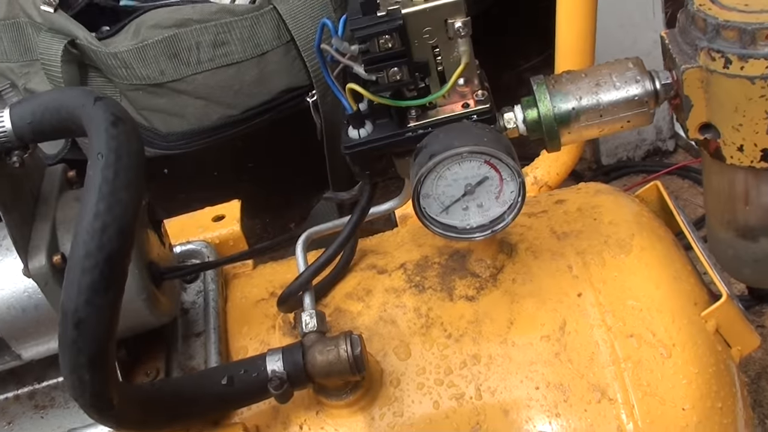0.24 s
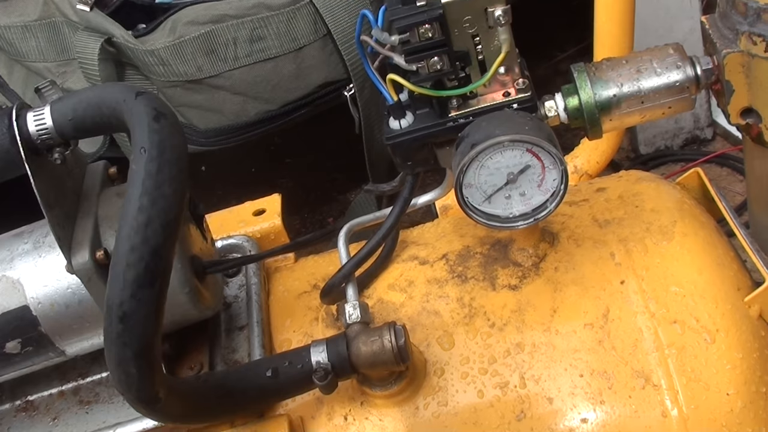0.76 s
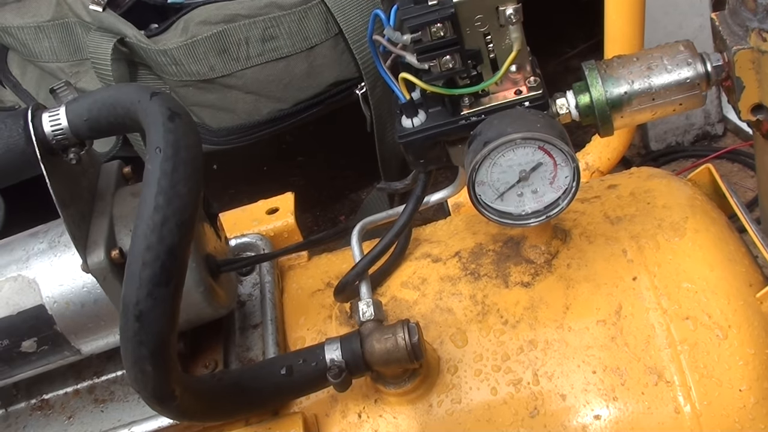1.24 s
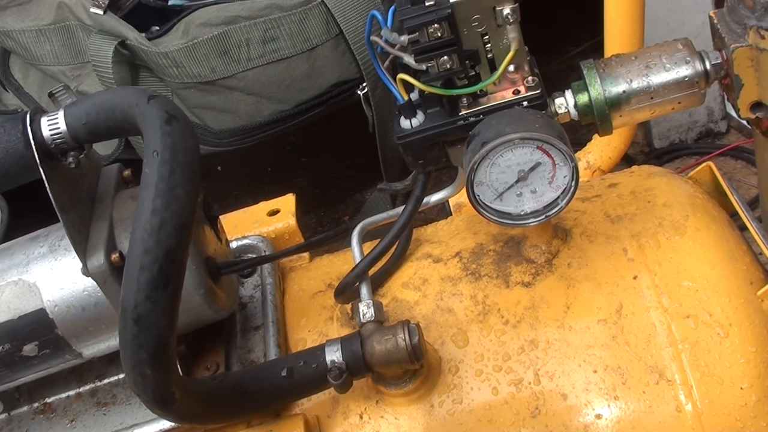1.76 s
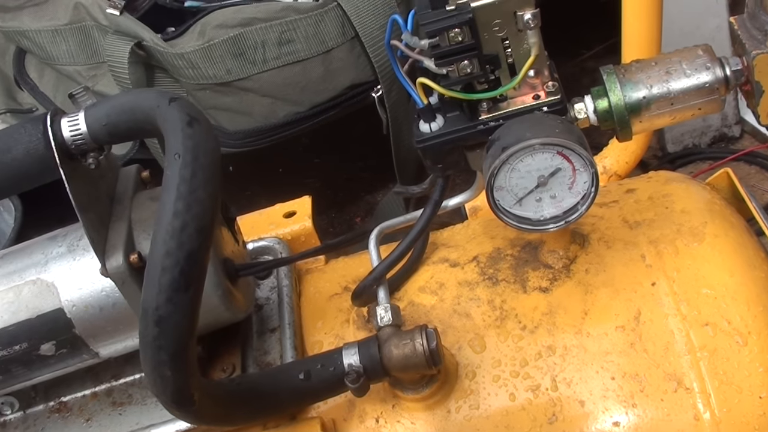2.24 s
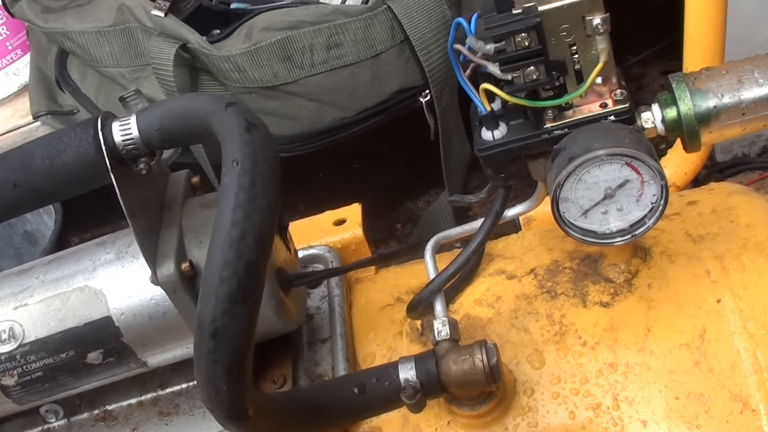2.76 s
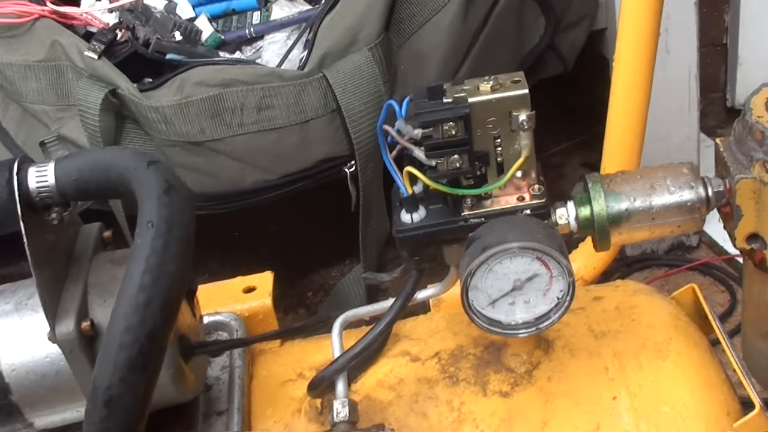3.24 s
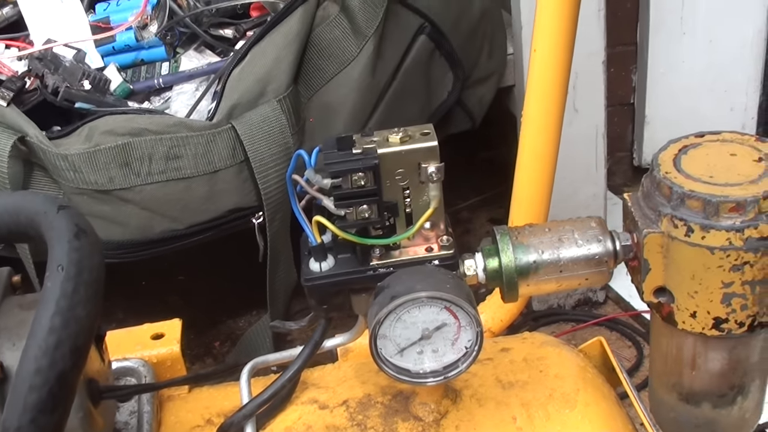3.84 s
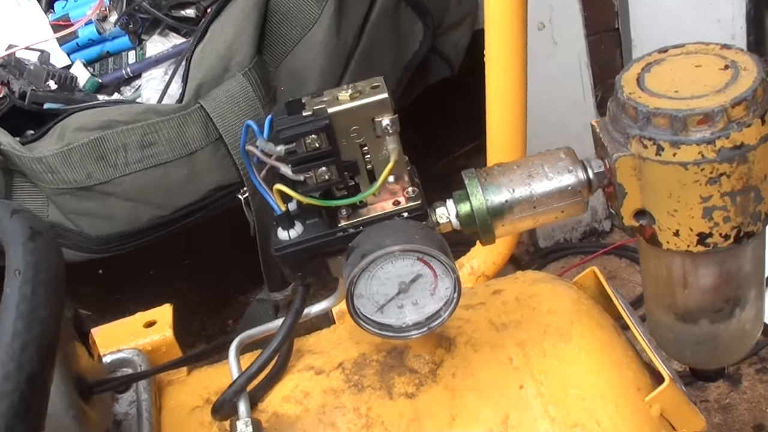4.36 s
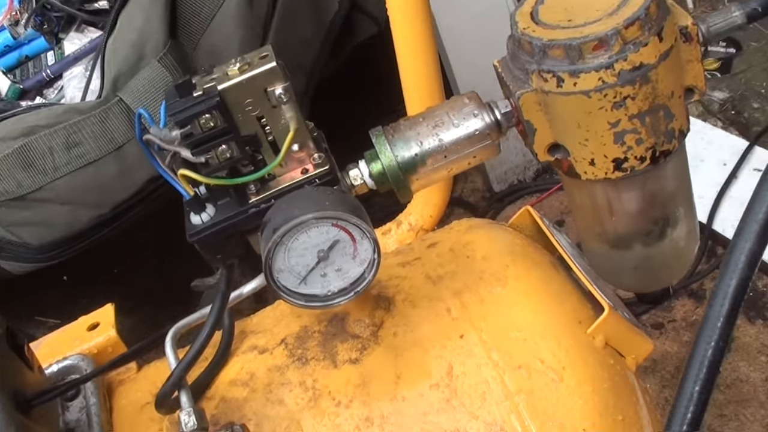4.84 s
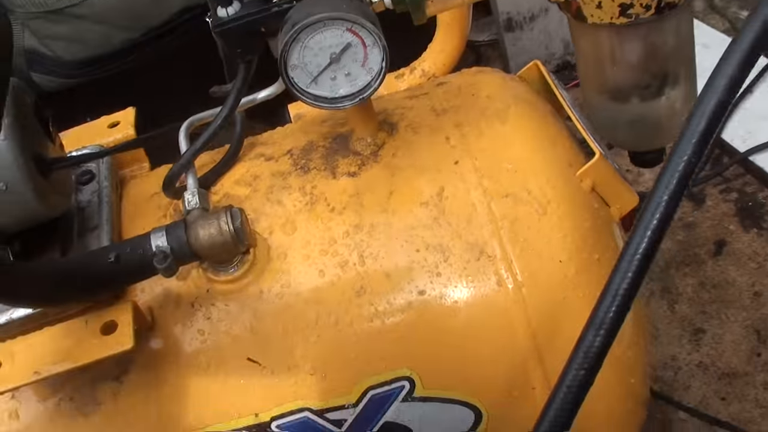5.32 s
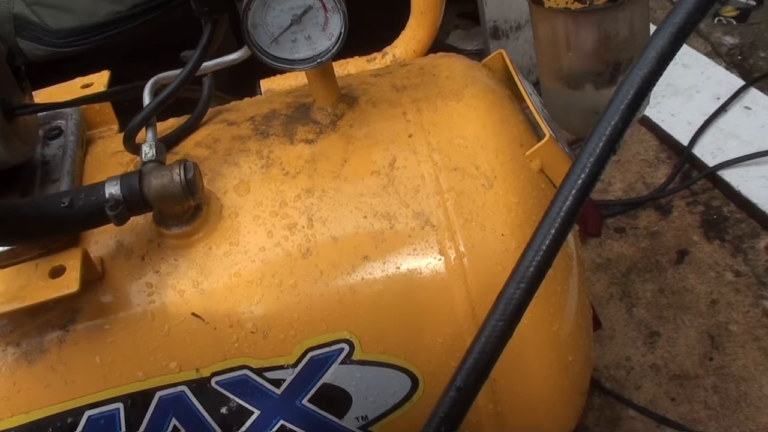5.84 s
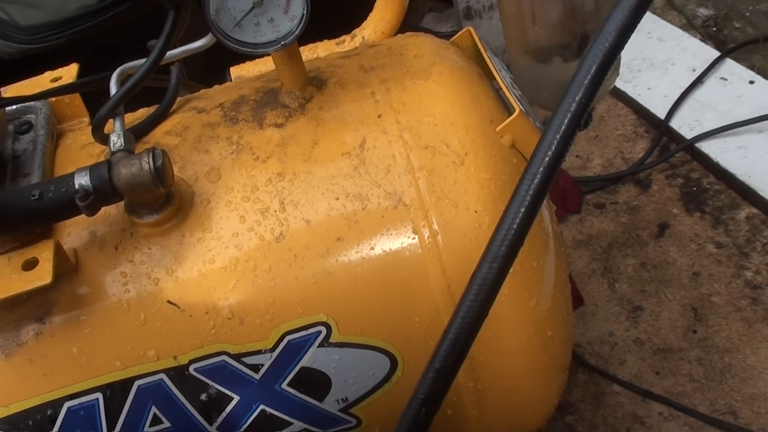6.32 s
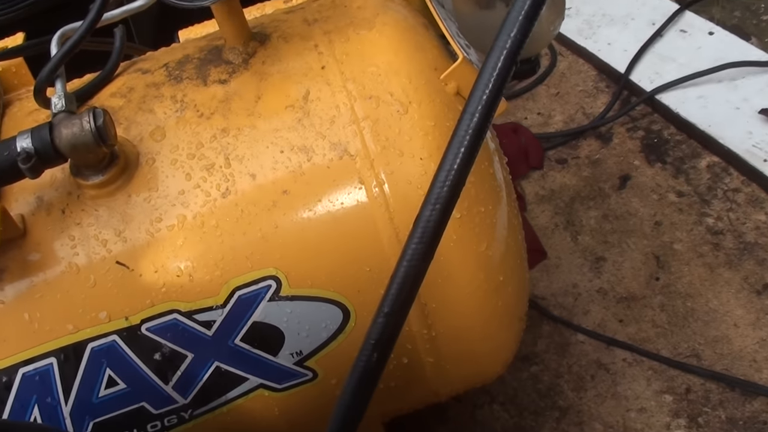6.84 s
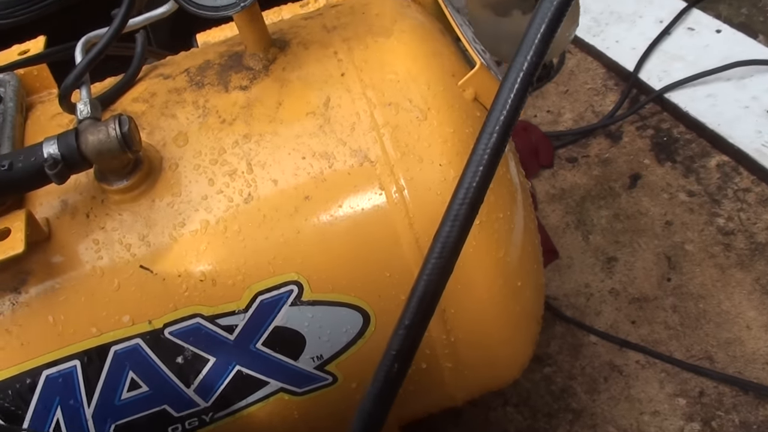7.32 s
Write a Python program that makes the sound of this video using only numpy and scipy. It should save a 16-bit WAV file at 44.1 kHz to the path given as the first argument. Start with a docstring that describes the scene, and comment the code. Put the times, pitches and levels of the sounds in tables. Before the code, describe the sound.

A continuous bright air leak fades a little, then grows strong close to the microphone, with scattered faint ticks and bumps over it.

```python
"""A workshop: compressed air hisses out of a compressor tank while a hand-held microphone moves over it.
The jet is noise in four bands with levels that vary in time; metal around it adds resonances and notches,
which change from the nook beside the pump to the pressure switch, the filter and the tank.
Dull handling knocks and ticks are decaying sines with a noise tail; the quiet room is steady coloured noise."""
import sys
import numpy as np
from scipy import signal
from scipy.fft import rfft, irfft
from scipy.io import wavfile

SR = 44100
rng = np.random.default_rng(int(sys.argv[2]) if len(sys.argv) > 2 else 0)


def dump_mix(stems):
    """Bounce the given channels to the path in sys.argv[1] as a 16-bit WAV at rate SR."""
    frames = np.atleast_2d(stems).T  # one column per channel
    limited = np.clip(frames, -1, 1)  # hard clip at full scale
    pcm = np.round(limited * 32767).astype(np.int16)
    wavfile.write(sys.argv[1], SR, pcm)


N = 334278
FRAME, HOP = 1024, 256  # samples
HZ = np.fft.rfftfreq(FRAME, 1 / SR)
T = np.arange(N // HOP + 5)[:, None] * HOP / SR  # frame times, s

# Jet at the moving microphone. Each row: time in seconds, hiss and fizz band levels in dB before the mix.
JET_LEVELS = [(0.03, -30, -34.5), (0.22, -30, -35.5), (0.34, -29.5, -35), (0.43, -33, -36.5),
              (1.1, -35, -38), (1.58, -38.5, -40.5), (2.1, -33.5, -37), (2.44, -36, -40.5),
              (3.36, -27.5, -32), (3.49, -24, -26), (3.53, -25, -32), (3.8, -20.5, -28), (3.97, -17.5, -22),
              (3.99, -21.5, -25.5), (4.78, -24, -23), (5.26, -24.5, -29), (5.41, -28, -30),
              (5.71, -25.5, -27), (5.81, -23.5, -29), (5.96, -23, -22.5), (6.15, -26, -22.5),
              (6.31, -25.5, -21.5), (6.44, -26.5, -27), (6.58, -24, -21), (7.42, -22.5, -20),
              (7.55, -21, -21.5)]
# Edges of the rush, body, hiss and fizz bands, in Hz.
JET_EDGES_HZ = [1200, 2500, 5500, 9500, 15800]
# Broad colour of the jet, before band levelling. Each row: frequency in Hz, relative density in dB per Hz.
JET_COLOUR = [(150, -31.5), (400, -22), (750, -20.5), (1300, -17), (2000, -13.5), (2550, -13), (3400, -9),
              (4500, -8.5), (5400, -5.5), (6700, -2), (8000, -3), (10000, -5), (12500, -3), (15800, -9)]
# Rush and body levels, one row per place on the way: rush in dB, body in dB, before the mix,
# when the hiss is at USUAL_HISS_DB.
LOWER_BANDS = [(-45.5, -36), (-43.5, -35), (-46.5, -37.5), (-44, -38.5)]
USUAL_HISS_DB = -29
RUSH_DB_PER_DB, BODY_DB_PER_DB = 0.37, 0.64  # how far they follow the hiss
# The microphone's way. Each row: time in seconds, place (0 nook, 1 pressure switch, 2 filter, 3 tank).
MIC_WAY = [(0, 0), (2.3, 0), (2.85, .8), (3.3, 1), (4.0, 1), (4.3, 2), (5.05, 2), (5.55, 3), (7.58, 3)]
# Resonances and notches at each place. Each row: centre in Hz, width in Hz, gain in dB before band levelling.
NOOK_MODES = [(925, 160, 7), (1270, 310, 7.5), (1520, 140, -5.5), (1660, 250, 5), (2030, 730, 5),
              (2675, 38, 10), (2800, 52, -4), (2953, 86, 7), (3257, 73, 9.5), (3710, 50, 7), (3866, 29, 9),
              (4100, 450, -2.5), (4500, 42, -5), (4730, 57, 12.5), (5370, 58, -6), (6160, 91, 7),
              (6650, 510, 1), (7040, 81, 7), (7150, 70, -4), (8030, 150, 8.5), (8440, 80, 6.5),
              (8600, 270, 1), (9900, 110, 8.5), (11120, 260, 3.5), (11736, 170, -1), (12000, 170, 3.4),
              (12500, 220, 0), (13500, 500, 9.5), (13950, 150, 7), (14500, 220, 5), (14729, 260, -11),
              (15400, 240, 0)]
SWITCH_MODES = [(1290, 230, 5.5), (1710, 110, 8), (2160, 100, 2.5), (3450, 160, 6.5), (4070, 180, -6),
                (4550, 73, 9), (6270, 99, 9.5), (6450, 100, 8), (6790, 330, 9.5), (7570, 100, 9),
                (8000, 80, 5), (8950, 600, -3), (9240, 90, 8), (15400, 740, -4)]
FILTER_MODES = [(1310, 140, 6.5), (1520, 150, -4), (3990, 150, 4.5), (6700, 430, 4.5), (7100, 220, 2),
                (9000, 180, 3.5), (10370, 180, 4.5), (11300, 200, 4), (11780, 160, -7), (12370, 200, 2),
                (13900, 200, 3), (14800, 650, -6)]
TANK_MODES = [(403, 320, 3.5), (945, 360, -5), (1300, 110, 1.5), (1560, 200, 3.5), (3340, 110, 1.5),
              (3950, 150, 5.5), (6650, 270, 5.5), (7200, 300, -0.5), (8850, 700, 2.5), (10120, 600, -3.5),
              (11500, 200, -5), (12000, 200, 4), (14300, 500, 5.5), (15350, 400, 6.5)]
# Breathy resonances swelling out of the noise. Each row: start in seconds, end in seconds (both at half lift),
# centre in Hz, width in Hz, lift in dB before band levelling.
BREATHY_SWELLS = [(3.7, 4.7, 12200, 220, 0), (4.6, 5.15, 12750, 500, 3), (5.4, 6.15, 2120, 300, 1),
                  (5.4, 5.65, 11100, 300, 5), (5.95, 6.45, 11900, 620, 7), (6.45, 6.85, 12500, 560, 7),
                  (6.75, 7.6, 477, 240, 5.5), (7.25, 7.62, 12500, 600, 6.5), (7.42, 7.7, 8700, 450, 5)]
SWELL_FADE_S = .3
# Spells of fuller jet. Each row: start in seconds, end in seconds (both at half lift), centre in Hz, lift in dB.
JET_SURGES = [(-.1, .42, 2960, 12), (0.425, 0.494, 2600, 12.5), (1.95, 2.203, 1300, 3),
              (3.517, 3.64, 3200, 5), (3.884, 4.12, 2370, 2.5), (5.396, 5.717, 1990, 2.5),
              (5.72, 6.3, 2390, 0.5)]
SURGE_EDGE_S, SURGE_OCTAVES = 0.05, 1.65
# Correlation of left and right. Each row: frequency in Hz, correlation from 0 to 1.
STEREO_LIKENESS = [(50, .99), (250, .98), (500, .93), (1200, .965), (2500, .965), (5000, .955), (8000, .96),
                   (10000, .98), (12400, .988), (13000, 1)]
# Left minus right, before PAN_WEIGHT. Each row: time in seconds, difference in dB.
PAN_CURVE = [(0, -1.2), (2.6, -1.2), (4, -.6), (7.58, -.5)]
# Weight of the left-right difference over the spectrum. Each row: frequency in Hz, factor.
PAN_WEIGHT = [(300, 0), (700, 2.2), (2200, 0), (3300, 1.8), (4400, .7), (5800, 1.9), (7500, 1.5),
              (9000, .1), (13000, 0)]
# Quiet room. Each row: frequency in Hz, relative density in dB per Hz.
ROOM_COLOUR = [(20, -17), (45, -17), (80, -9.5), (100, -6), (120, 3.5), (145, -7), (210, -2), (400, -3.5),
               (600, -8.5), (1000, -6.5), (2500, -27.5)]
ROOM_RMS_DB = -53
# Handling knocks and ticks. Each row: time in seconds, peak of the ringing in dB before the mix,
# centre in Hz, spread in octaves, base t60 in seconds.
KNOCKS = [(0.486, -25.5, 750, 1.2, 0.049), (1.46, -28, 1700, .43, 0.025), (1.944, -29.5, 750, 1.3, .04),
          (2.828, -24.5, 1700, .35, 0.015), (3.498, -21.5, 1000, 1, .037), (3.969, -21, 350, 1.3, 0.095),
          (4.075, -32.5, 450, 1.5, 0.14), (4.840, -20.5, 516, 0.2, 0.095), (5.337, -13, 850, 2, 0.058),
          (5.977, -24.5, 486, 0.86, .04), (6.272, -22.5, 1600, 2.6, .016), (6.297, -29, 2000, .88, .007),
          (7.110, -31, 680, 0.24, 0.075), (7.138, -26.5, 670, 0.23, 0.058),
          (7.227, -17.5, 740, 0.18, 0.073), (7.547, -30, 750, .75, 0.016)]
# Modes the knocks ring. Each row: frequency in Hz, relative level in dB, factor on the knock's base t60.
BODY_MODES = [(65, -9, 1.5), (207, -7.5, 2.3), (262, -5, 1.1), (410, 0.5, 1.15), (503, -4, 0.53),
              (654, -5.5, 1.8), (760, -4.5, 0.87), (936, 0, 1.4), (1013, -2.5, 2.1), (1145, 2, 0.81),
              (1460, -2.5, 0.55), (1780, -1.5, 0.91), (1884, -7, 0.95), (2280, 2, 0.84), (2740, 1, 0.51)]
JET_MIX_DB, KNOCK_MIX_DB = 1.77, -0.5
BAND_LIMIT_HZ = 15950


def amp(db):
    """Decibels to gain."""
    return 10 ** (np.asarray(db) / 20)


def evened(x):
    """Scales to rms 1."""
    return x / np.sqrt(np.mean(x ** 2) + 1e-20)


def over_hz(points):
    """Interpolates a spectrum table at every bin, on a log frequency axis."""
    hz, value = np.transpose(points)
    return np.interp(np.log(HZ + 1), np.log(hz), value)


def over_time(points):
    """Interpolates each column of a curve table at every frame."""
    s, *columns = np.transpose(points)
    return [np.interp(T, s, column) for column in columns]


def bell(offset, width):
    """Bump of height 1 with the given full width at half height."""
    return .5 ** ((2 * offset / width) ** 2)


def patches(seconds, width_hz):
    """Random field of rms 1 over frames and bins, smoothed by bells of the given time and bandwidth."""
    field = rng.standard_normal((len(T), len(HZ)))
    field = signal.fftconvolve(field, bell(T - T.mean(), seconds), "same", axes=0)
    field = signal.fftconvolve(field, bell(HZ - HZ.mean(), width_hz)[None], "same", axes=1)
    return evened(field)


def noise(gain):
    """Noise for two close microphones; the squared gains of a frame sum to its power."""
    a, b, c, d = rng.standard_normal((4, len(T), len(HZ)))
    same = np.clip(over_hz(STEREO_LIKENESS), 0, 1)
    mid = (a + 1j * b) * np.sqrt((1 + same) / 2)
    side = (c + 1j * d) * np.sqrt((1 - same) / 2)
    spectra = gain * np.array([mid + side, mid - side])
    _, sound = signal.istft(spectra, nperseg=FRAME, noverlap=FRAME - HOP, time_axis=1, freq_axis=2)
    return sound[:, :N]


def add(mix, start_s, sound):
    """Mixes a sound in at its start time."""
    part = mix[:, round(start_s * SR):][:, :sound.shape[1]]
    part += sound[:, :part.shape[1]]


def nearness():
    """Share of each place in what the microphone hears, frame by frame: linear crossfades along its way."""
    place, = over_time(MIC_WAY)
    return [np.maximum(1 - abs(place - k), 0) for k in range(len(LOWER_BANDS))]


def reflections(still_db=2.0, drift_db=2.36):
    """Colour in dB from nearby metal: crossfading resonances, plus slow and quick random ripple (rms dB)."""
    rings = 0
    for share, modes in zip(nearness(), [NOOK_MODES, SWITCH_MODES, FILTER_MODES, TANK_MODES]):
        rings = rings + share * sum(db * bell(HZ - hz, width_hz) for hz, width_hz, db in modes)
    slow = still_db * patches(seconds=1.85, width_hz=27)
    quick = drift_db * patches(seconds=0.17, width_hz=47)
    return rings + slow + quick


def swells():
    """Lift in dB of narrow bands that rise, hold and fade."""
    half_s = SWELL_FADE_S / 2
    lift_db = 0
    for start_s, end_s, hz, width_hz, db in BREATHY_SWELLS:
        outside_s = T - np.clip(T, start_s + half_s, end_s - half_s)  # zero during the hold
        lift_db = lift_db + db * bell(HZ - hz, width_hz) * bell(outside_s, SWELL_FADE_S)
    return lift_db


def surges():
    """Lift in dB of a broad part of the midrange that comes and goes quickly."""
    lift_db = 0
    for start_s, end_s, hz, db in JET_SURGES:
        inside_s = np.minimum(T - start_s, end_s - T)
        envelope = np.clip(inside_s / SURGE_EDGE_S + .5, 0, 1)
        lift_db = lift_db + db * bell(np.log2((HZ + 1) / hz), SURGE_OCTAVES) * envelope
    return lift_db


def jet_levels():
    """Rush, body, hiss and fizz in dB: the lower two depend on the place and partly follow the hiss."""
    hiss_db, fizz_db = over_time(JET_LEVELS)
    rush_db, body_db = sum(np.multiply.outer(levels_db, share)
                           for levels_db, share in zip(LOWER_BANDS, nearness()))
    above_db = hiss_db - USUAL_HISS_DB
    return rush_db + RUSH_DB_PER_DB * above_db, body_db + BODY_DB_PER_DB * above_db, hiss_db, fizz_db


def levelled(gain):
    """Brings the four bands of the jet close to their levels with smoothly blended corrections."""
    bands = list(zip(JET_EDGES_HZ, JET_EDGES_HZ[1:]))
    centres_hz = np.sqrt(np.prod(bands, axis=1))
    blends = [over_hz(np.transpose([centres_hz, row])) for row in np.eye(len(bands))]
    levels_db = jet_levels()
    for _ in bands:  # corrections overlap, so make four passes
        for (low_hz, high_hz), level_db, blend in zip(bands, levels_db, blends):
            inside = (HZ >= low_hz) & (HZ < high_hz)
            power = np.sum(gain[:, inside] ** 2, axis=1, keepdims=True)
            gain = gain * amp(blend * (level_db - 10 * np.log10(power)))
    return gain


def jet(flutter_db=0.43, eddy_db=0.63, apart_db=1.05):
    """Turbulent noise of escaping air, coloured by nearby metal and fluttering a little (rms dB)."""
    gain = levelled(amp(over_hz(JET_COLOUR) + reflections() + swells()))
    flutter = flutter_db * patches(seconds=0.023, width_hz=14000)
    eddies = eddy_db * patches(seconds=0.032, width_hz=620)
    # each microphone sits in a slightly different pattern of reflections
    pan_db, = over_time(PAN_CURVE)
    difference_db = pan_db + apart_db * patches(seconds=0.55, width_hz=62)
    lean_db = over_hz(PAN_WEIGHT) * difference_db / 2
    return noise(gain * amp(surges() + flutter + eddies + np.array([lean_db, -lean_db])))


def room():
    """Steady low murmur of air in the workshop: noise of fixed colour."""
    murmur = noise(amp(over_hz(ROOM_COLOUR)) * np.ones_like(T))
    return amp(ROOM_RMS_DB) * evened(murmur)


def knock(db, centre_hz, octaves, t60_s, contact_db=-14, contact_t60_s=0.017,
          tail_db_at_9ms2=-24, tail_t60_s=0.17, lowest_hz=70):
    """A blow jolts all modes and leaves those near its centre ringing; the workshop adds a faint noise tail."""
    t = np.arange(SR // 3) / SR

    def weight(hz):
        return bell(np.log2(hz / centre_hz), 2 * octaves)

    jolt = amp(contact_db - 60 * t / contact_t60_s)
    ring = np.zeros(len(t))
    for hz, level_db, life in BODY_MODES:
        envelope = jolt + weight(hz) * amp(-60 * t / (t60_s * life))
        ring += rng.choice([-1, 1]) * amp(level_db) * envelope * np.sin(2 * np.pi * hz * t)
    # the knocks carry no deep bass
    ring = signal.sosfilt(signal.butter(2, lowest_hz, "high", fs=SR, output="sos"), ring)

    hz = np.fft.rfftfreq(len(t), 1 / SR) + 1
    colour = weight(hz) / (1 + (hz / 2200) ** 2)
    spread = irfft(rfft(rng.standard_normal((2, len(t)))) * colour, len(t))
    tail = evened(spread + spread.mean(0)) * amp(tail_db_at_9ms2 - 60 * t / tail_t60_s)
    tail *= np.sqrt(t60_s / 0.0092)  # longer knocks leave more tail; reference t60 9.2 ms
    return amp(db) * (ring / abs(ring).max() + tail)


def scene():
    """Mixes the jet, the room and the handling knocks."""
    knocks = np.zeros((2, N))
    for start_s, *blow in KNOCKS:
        add(knocks, start_s, knock(*blow))
    return amp(JET_MIX_DB) * jet() + amp(KNOCK_MIX_DB) * knocks + room()


def record(dry):
    """The recorder's band limit: a linear-phase low-pass."""
    lowpass = signal.firwin(511, BAND_LIMIT_HZ, window=("kaiser", 9), fs=SR)
    return signal.oaconvolve(dry, lowpass[None], "same")


dry = scene()
out = record(dry)
dump_mix(out)
```